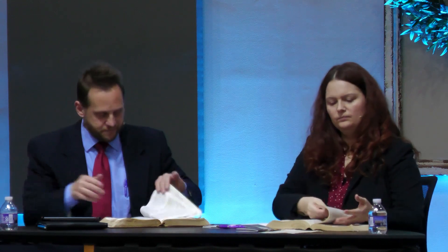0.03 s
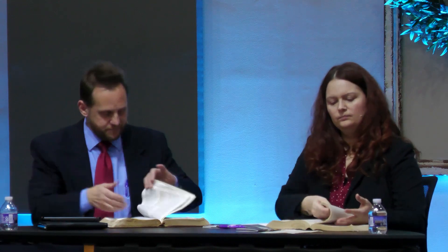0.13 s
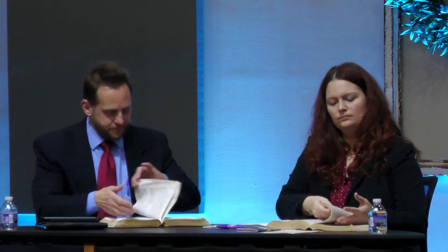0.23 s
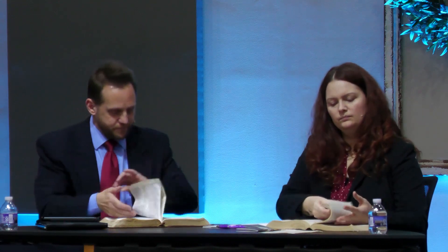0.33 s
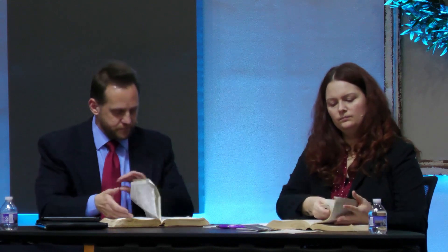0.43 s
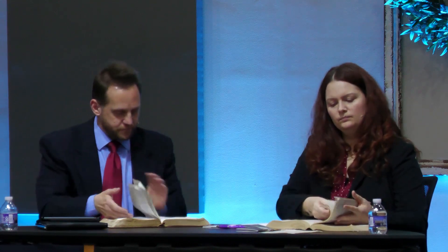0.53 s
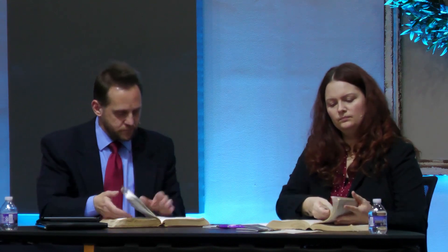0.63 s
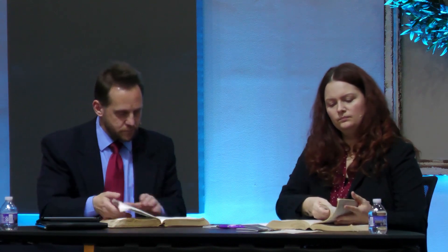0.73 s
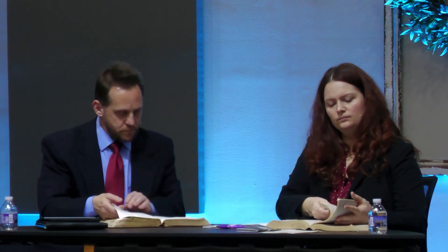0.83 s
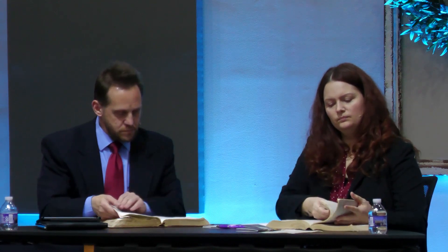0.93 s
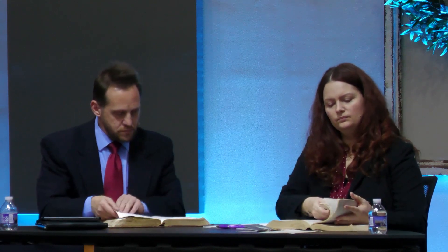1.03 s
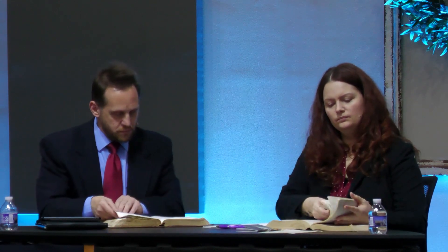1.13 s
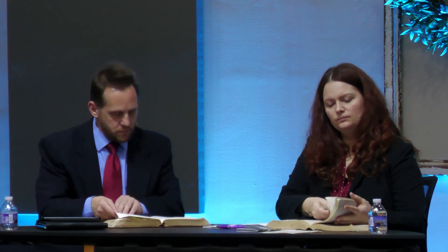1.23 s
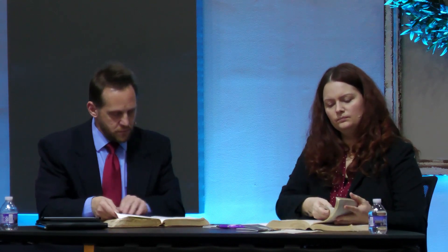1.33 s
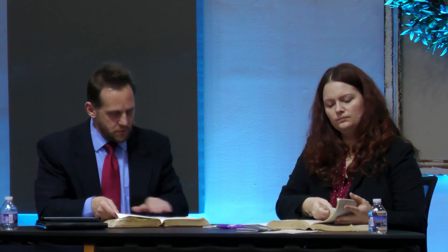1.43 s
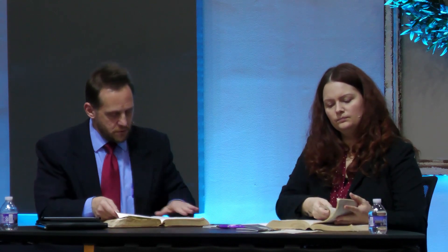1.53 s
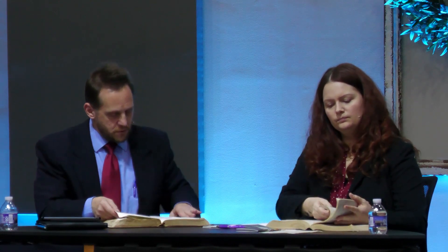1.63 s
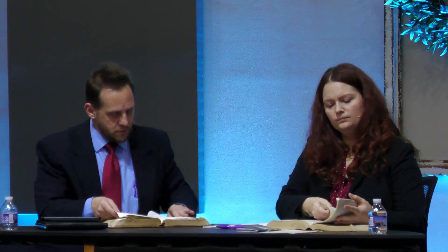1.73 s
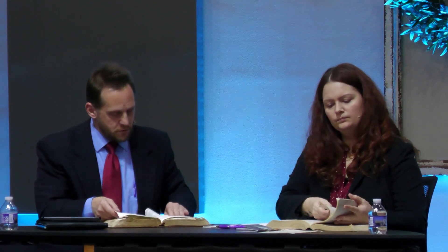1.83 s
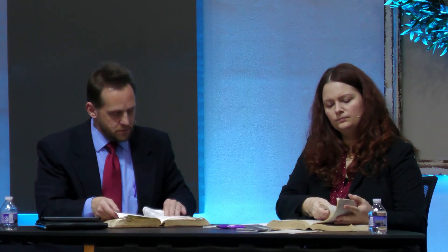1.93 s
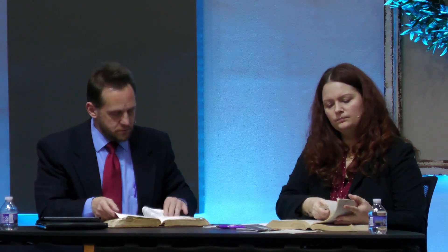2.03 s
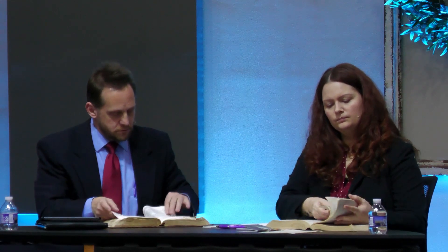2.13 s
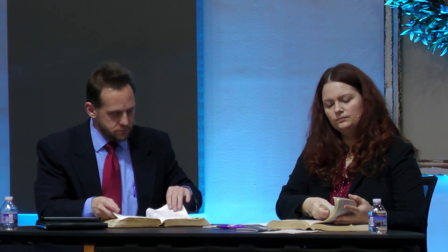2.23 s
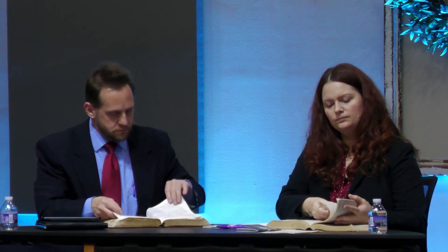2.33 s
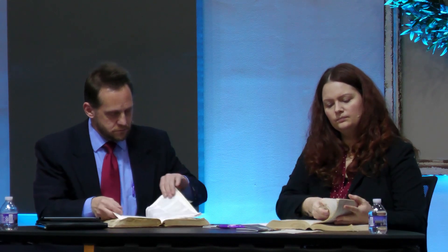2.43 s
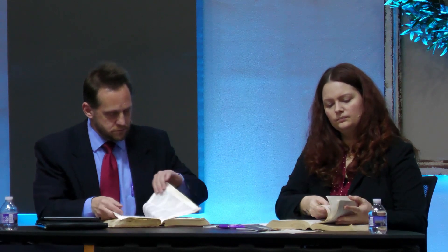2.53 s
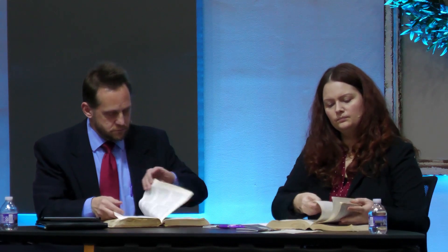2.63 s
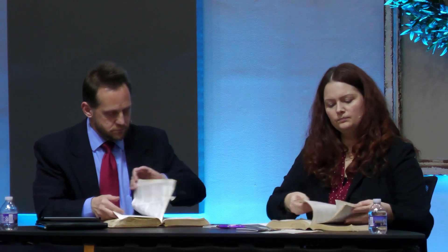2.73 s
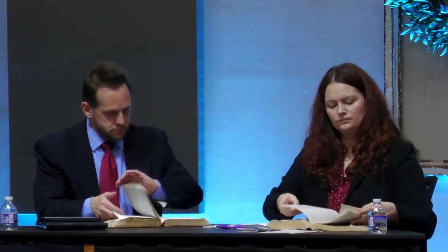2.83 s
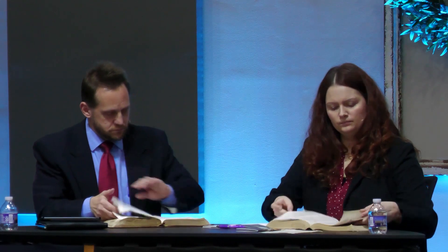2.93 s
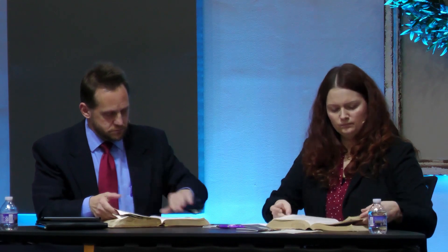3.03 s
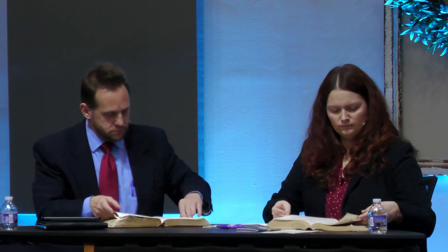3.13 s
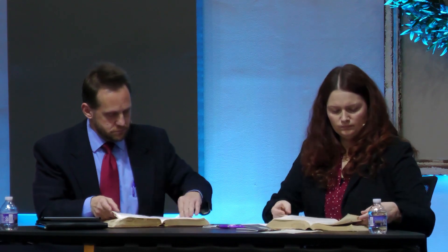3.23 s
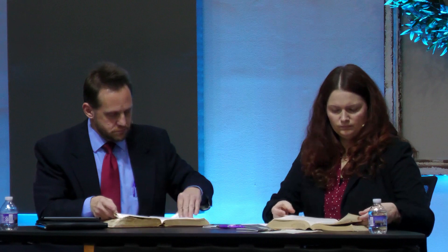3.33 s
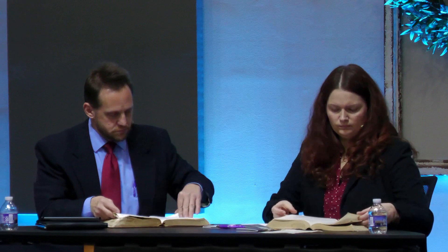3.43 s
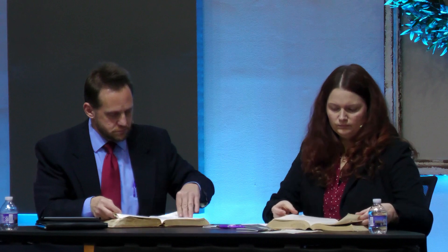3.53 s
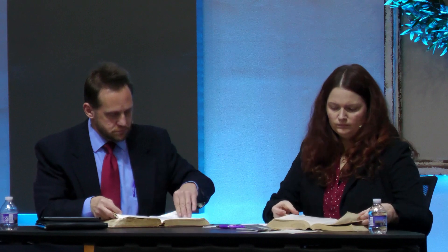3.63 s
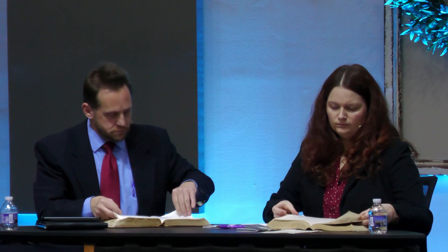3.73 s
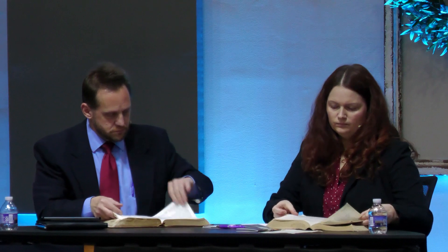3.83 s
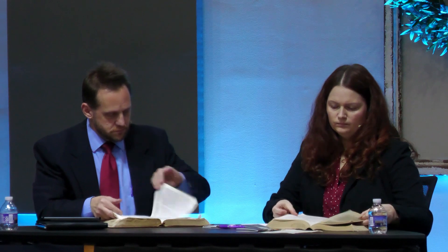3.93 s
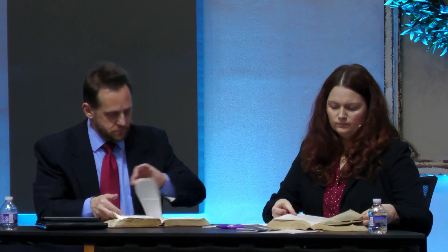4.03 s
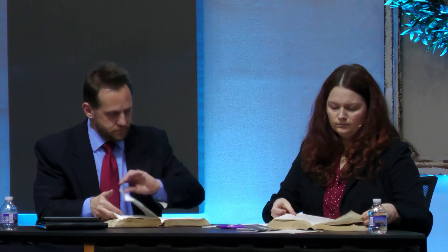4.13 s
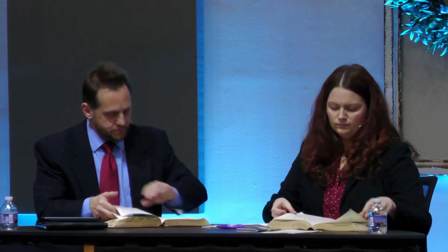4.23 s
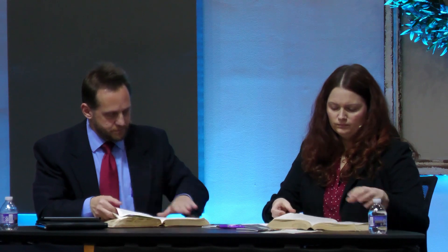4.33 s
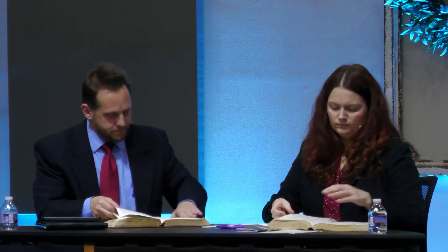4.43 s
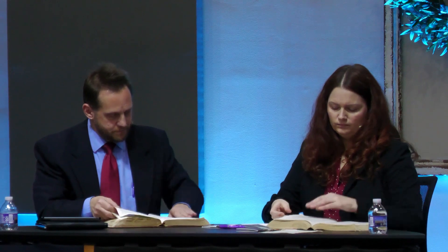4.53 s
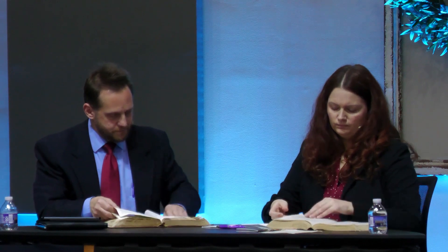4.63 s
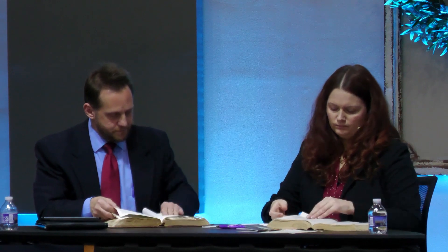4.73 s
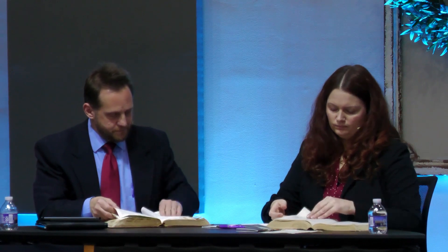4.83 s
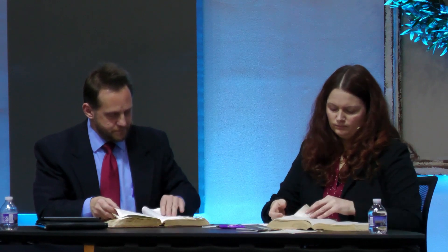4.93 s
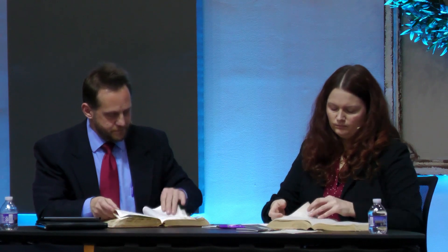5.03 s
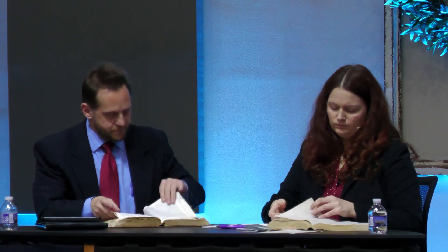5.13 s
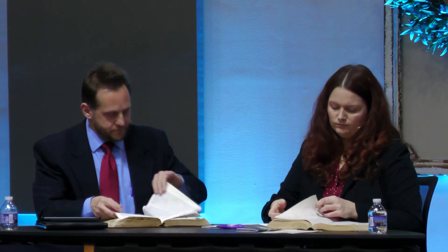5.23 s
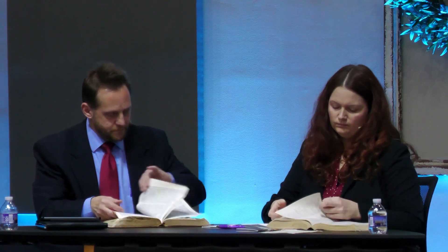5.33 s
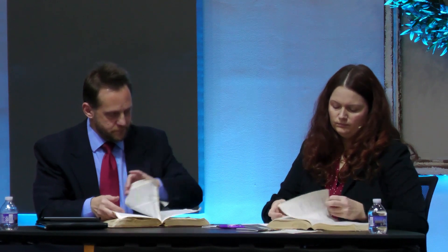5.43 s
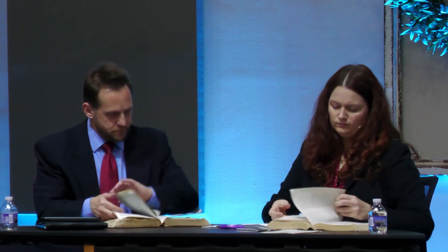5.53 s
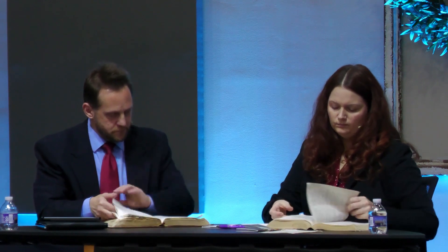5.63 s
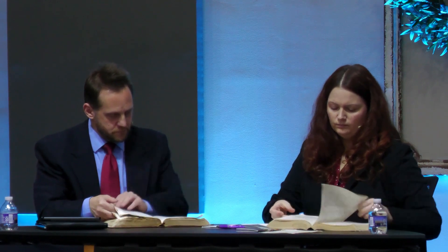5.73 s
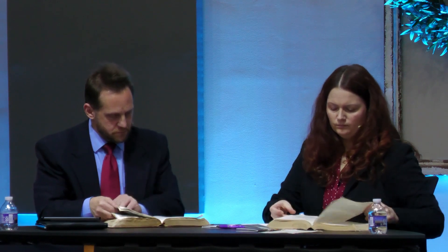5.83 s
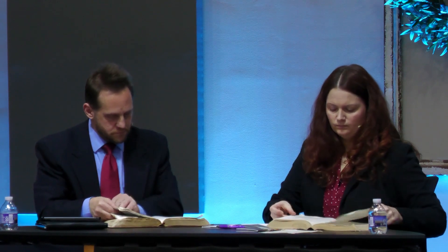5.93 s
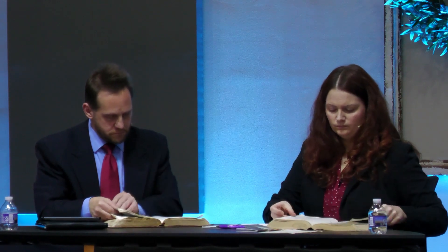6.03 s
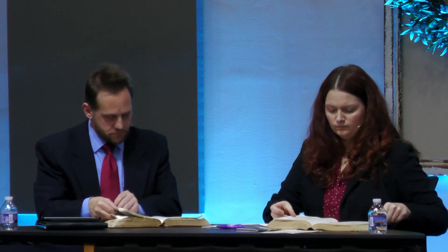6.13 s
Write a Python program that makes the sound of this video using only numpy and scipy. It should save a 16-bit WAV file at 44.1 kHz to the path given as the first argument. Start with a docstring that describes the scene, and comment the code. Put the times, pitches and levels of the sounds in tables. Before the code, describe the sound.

Close, soft rustling and sliding of thin paper as two readers turn book pages, with small snaps over faint ventilation.

```python
"""Two readers leaf through thin-paged books at a table in a quiet hall, close to a microphone.
First, sliding sheets hiss, bending pages rustle, creases buckle in short snaps and leaves flap down.
After a second the handling grows quiet; from about 2.5 s the snaps and rustles pick up again.
The last second is the busiest, with a sharp snap and then several flaps as leaves land on the stack.
Soft sleeves, ventilation and a faint hiss lie underneath throughout."""
import sys
import numpy as np
from scipy import signal
from scipy.fft import rfft, irfft, next_fast_len
from scipy.io import wavfile
from scipy.ndimage import uniform_filter1d, map_coordinates

SR = 44100
rng = np.random.default_rng(int(sys.argv[2]) if len(sys.argv) > 2 else 0)


def file_out(sig):
    """Save sig as 16-bit WAV at sys.argv[1]."""
    # one column per channel
    cols = np.atleast_2d(sig).T
    # limit, then scale
    lim = np.clip(cols, -1, 1)
    pcm = np.round(lim * 32767).astype(np.int16)
    wavfile.write(sys.argv[1], SR, pcm)


N = 272626


def rustle():
    """Sliding sheets hiss and bending sheets rustle; the uneven drag of the hand shakes both."""
    # tone of sliding and of bending paper: (frequency [Hz], level [dB])
    slide_tone = [(300, -27.5), (1200, -17), (2500, -15), (4500, -6), (7000, -1.5), (9000, -2), (11000, -2),
                  (13500, -5.5), (15500, -10)]
    bend_tone = [(100, -15.5), (250, -15.5), (450, -10), (800, -7.5), (1200, -5.5), (1800, -1),
                 (2600, -0.5), (3700, -0.5), (4700, 1), (7000, -5.5), (15000, -30.5)]
    # how the air under a lifted leaf changes the tone: (frequency [Hz], gain [dB])
    hollow_tone = [(1000, 5), (2800, 1.5), (3900, 4.5), (4600, -5.5), (5500, -7), (7000, -1.5), (9200, 2.5),
                   (12000, 0), (15000, -8)]
    now = np.arange(N) / SR
    bend_db, slide_db = handling(now)
    drag_db = 0.75 * wobble(55)
    hiss = friction(slide_tone, slips_per_s=6000, spread_db=4.5, smooth=1.04, patchy_db=2.5)
    # a faster slide is louder and also brighter, most of all when the sheet lies flat
    speed = np.clip((slide_db + 60) / 12 + 0.05 * (slide_db - bend_db - 8), 0, 1.3)
    bright_hiss = unit(coloured(hiss, lambda hz: along([(8000, 0.5), (15000, 6.1)], hz)))
    slide = amp(slide_db + drag_db + 1.72) * ((1 - speed) * hiss + speed * bright_hiss)
    bend_gain = amp(bend_db + drag_db + 1.7 * wobble(70) + 0.5)
    bend = bend_gain * friction(bend_tone, slips_per_s=1200, spread_db=3, smooth=1.42, patchy_db=3)
    # the more a sheet bends, the more it crinkles
    bending = np.clip((bend_db - slide_db + 18.5) / 17, 0.2, 1)
    sheets = (slide + bend) * crinkle(share=0.48 * bending)
    pocket = air_pocket(now)
    hollow = coloured(sheets, lambda hz: along(hollow_tone, hz))
    return (1 - pocket) * sheets + pocket * hollow


def handling(now, rise_s=0.012, rest_s=0.023, sag_db_per_s=4):
    """Bending and sliding levels in dB: the hand gets going, slows a little, and the sheet comes to rest."""
    # strokes of a hand moving a page: (start [s], length [s], bending level [dB], sliding level [dB])
    strokes = [(-0.01, 0.038, -54.5, -49.5), (0.04, 0.037, -53.5, -58), (0.151, .15, -58, -53.5),
               (0.4, 0.05, -54, -69), (0.688, 0.014, -52, -48.5), (0.716, 0.066, -50, -65),
               (0.808, 0.068, -58.5, -61), (1.247, 0.13, -62.5, -65.5), (1.68, 0.19, -67.5, -67),
               (1.862, 0.18, -71, -60), (2.154, 0.059, -74, -59.5), (2.28, .3, -63, -66.5),
               (2.677, 0.12, -57.5, -56), (2.913, 0.065, -55.5, -58), (3.049, 0.032, -61.5, -51.5),
               (3.282, 0.1, -70, -52.5), (3.44, 0.066, -65, -54), (3.6, 0.058, -70, -62),
               (3.702, 0.052, -68, -53.5), (3.843, 0.096, -54.5, -53.5), (4.009, 0.033, -53.5, -48),
               (4.106, 0.031, -55.5, -72), (4.151, 0.026, -66, -46), (4.363, .11, -69, -61),
               (4.559, 0.091, -68, -59), (4.68, 0.063, -62.5, -57.5), (4.818, 0.097, -73, -56),
               (4.944, 0.029, -66, -52), (5.043, 0.069, -55.5, -45), (5.131, 0.086, -53.5, -47),
               (5.293, 0.01, -58, -57), (5.392, 0.068, -55.5, -49), (5.543, 0.086, -54, -48.5),
               (5.678, 0.1, -65, -51.5), (5.804, 0.034, -51.5, -52), (5.891, 0.11, -62, -52),
               (6.005, 0.09, -75, -47)]
    # fingers resting on the paper between strokes: (time [s], hiss level [dB])
    resting_fingers = [(0, -55.5), (0.62, -70), (2.12, -76.5), (2.65, -58), (3.2, -66.5), (3.95, -62.5),
                       (4.3, -67.5), (5.0, -64), (5.7, -58), (6.18, -64)]
    touch = amp(np.interp(now, *np.transpose(resting_fingers)))
    bend_power, slide_power = (amp(-2.5) * touch) ** 2, touch ** 2
    for start, length, bend_db, slide_db in strokes:
        t = now - start
        rise = np.clip(t / rise_s, 0, 1)
        hold = amp(-sag_db_per_s * np.clip(t, 0, length))
        stroke = rise * hold * np.exp(-np.maximum(t - length, 0) / rest_s)
        bend_power += (amp(bend_db) * stroke) ** 2
        slide_power += (amp(slide_db) * stroke) ** 2
    return 10 * np.log10(bend_power), 10 * np.log10(slide_power)


def friction(tone, slips_per_s, spread_db, smooth, patchy_db):
    """Paper fibres make tiny slips over a smooth hiss; the tone shifts as the sheet changes shape."""
    slips = (rng.random(N) < slips_per_s / SR) * rng.choice([-1, 1], N)
    slips = slips * amp(spread_db * np.clip(rng.standard_normal(N), -2, 2))
    spectrum = signal.stft(unit(slips) + smooth * rng.standard_normal(N), nperseg=256)[2]
    # random louder and softer patches, smoothed over frequency and then over time
    patches = uniform_filter1d(rng.standard_normal(spectrum.shape), size=5, axis=0)
    patches = uniform_filter1d(patches, size=18, axis=1)
    shifting = signal.istft(spectrum * amp(patchy_db * unit(patches)), nperseg=256)[1][:N]
    return unit(coloured(shifting, lambda hz: along(tone, hz)))


def crinkle(share, creases_per_s=110, spread_db=3, fade_s=0.0013):
    """Gain of a crumpling sheet: tiny creases give way at random, each a brief surge of the rustle."""
    gives_way = rng.random(N) < creases_per_s / SR
    power = amp(spread_db * np.minimum(rng.standard_exponential(N), 3)) ** 2
    surges = signal.lfilter([1], [1, -np.exp(-1 / (fade_s * SR))], gives_way * power)
    return np.sqrt(1 - share + share * surges / surges.mean())


def air_pocket(now, lift_s=0.099, sink_s=0.082):
    """The share of the rustle, from 0 to 1, that passes through the air under a lifted leaf."""
    # times when a leaf is held up: (start [s], length [s])
    pockets = [(4.14, 0.099), (5.795, 0.26)]
    shares = [np.exp(np.minimum(now - start, 0) / lift_s - np.maximum(now - start - length, 0) / sink_s)
              for start, length in pockets]
    return np.max(shares, axis=0)


def snaps():
    """A crease strains, buckles in a burst of tiny cracks, and the sheet shivers briefly after it."""
    # creases buckling: (time [s], level [dB], length [s], low body [dB], crisp top [dB])
    buckles = [(0.043, -30.5, .0022, -21, -1.5), (0.0775, -34.5, 0.0034, -17, 1),
               (0.2074, -35, .0025, -11, 10), (0.2562, -34, 0.002, -20, 6), (0.3744, -40.5, 0.0019, -6, 2),
               (0.422, -44.5, .0028, 0, -2), (0.452, -39, 0.0015, 4, -22), (0.471, -48, 0.0038, 4, 23),
               (0.5846, -51.5, .002, -15, -7), (1.031, -48.5, 0.004, -6, -3.5),
               (1.0793, -39.5, 0.0017, -9, 5.5), (1.153, -45, 0.0022, -12, -3),
               (1.1637, -47.5, 0.0034, -9, 0), (1.563, -56, .0028, 10, -3), (1.8305, -40, 0.0019, 9, 0.5),
               (2.129, -46, .0009, -17, 10), (2.26, -39, 0.00085, -3, 5), (2.5053, -40, 0.0037, -3, -1.5),
               (2.5546, -31.5, 0.0031, -31, -8.5), (2.7025, -30, 0.00062, -16, 2),
               (2.7887, -30.5, 0.00067, -5, 5.5), (2.842, -44.5, 0.0023, -21, -10),
               (2.944, -39.5, 0.0052, -32, 5), (2.986, -44, .0011, -20, 4), (3.0218, -44, 0.0032, -6, -9),
               (3.423, -35.5, .0004, -11, 20), (3.5776, -42.5, 0.0031, -20, -6),
               (3.591, -30.5, 0.0011, -17, 1.5), (3.624, -33.5, 0.0022, -0.5, 11),
               (3.6579, -31.5, 0.00067, -22, 3), (3.7666, -39, 0.0017, -7, -10),
               (3.7833, -34, 0.0012, -12, 7), (3.8185, -35.5, 0.0044, -7, 2), (3.9031, -25, 0.0015, -8, 7),
               (3.9313, -26.5, 0.0016, -12, 1.5), (4.731, -42, 0.0026, 0.5, 6),
               (4.8765, -42.5, 0.0019, -22, 7), (4.959, -33, 0.00073, -18, -2),
               (4.9928, -22, 0.00034, -20, 4), (5.034, -36, 0.0022, -16, 3), (5.2744, -36, 0.0021, -4, 6),
               (5.3556, -39.5, .0007, -8, 7), (5.404, -37.5, 0.0025, -4.5, 1),
               (5.5255, -14.5, 0.00052, -18.5, 3), (5.53, -30, 0.0022, -19, -5),
               (5.8051, -26.5, 0.0043, -3.5, 11.5), (6.1155, -39, 0.0022, -5, 6)]
    # tone shared by all creases: (frequency [Hz], level [dB])
    crease_tone = [(150, -17), (500, -5.5), (1000, -10), (2000, -7.5), (3500, -2), (6000, 1), (7700, -2),
                   (9400, 1), (11000, -2), (13500, -5.5), (16000, -15.5)]
    track, t = np.zeros(N), np.arange(-SR // 30, SR // 20) / SR
    after, before = np.maximum(t, 0), np.minimum(t, 0)
    for time, db, length, low_db, top_db in buckles:
        burst = np.exp(before / (0.065 * length) - (after / (1.37 * length)) ** 2)
        shiver = amp(-9.5) * np.sqrt(length / 0.0015) * np.exp(before / 0.00077 - after / 0.0025)
        cracks = rng.standard_normal(len(t)) * amp(2.2 * rng.standard_normal(len(t)))
        cracks *= np.hypot(np.hypot(burst, shiver), nearby_creases(t))
        own_tone = [(450, -9), (950, low_db + 8.5), (2000, 0.55 * low_db + 5),
                    (4200, 0.5), (9500, top_db), (15500, 0.81 * top_db)]
        tone = lambda hz: along(crease_tone, hz) + along(own_tone, hz) + sheet_ripple(hz, depth_db=0.5)
        snap = coloured(cracks, tone)
        add(track, time + t[0], amp(db) * np.sqrt(length * SR) * snap / np.linalg.norm(snap))
    return track


def nearby_creases(t, count=5, spread_s=0.012, fade_s=0.00052):
    """Strength over time of the small creases that give way just before and after a large one."""
    age = t - spread_s * rng.uniform(-0.3, 2, (count, 1))
    sizes = amp(-18 + 2.3 * rng.uniform(-1.1, 1, (count, 1)))
    return np.sum(sizes * (age > 0) * np.exp(-np.abs(age) / fade_s), axis=0)


def flaps():
    """A leaf swells in sound as it swings, then slaps and settles with a hollow papery puff."""
    # leaves landing: (time [s], level [dB], rise [s], fall [s], brightness [dB per octave])
    landings = [(0.020, -40, 0.0068, 0.0044, 13), (0.523, -47.5, 0.0018, 0.013, -1.5),
                (0.776, -38.5, 0.011, 0.0052, 6), (1.372, -54, 0.0084, 0.0046, 6),
                (2.95, -45, 0.0031, 0.0055, 11), (4.604, -54, 0.0082, .010, -17),
                (5.548, -42, 0.0034, 0.016, -3), (5.619, -46, 0.0036, 0.0094, -9.5),
                (5.745, -47.5, .012, 0.011, -8.5), (5.808, -29, 0.0073, 0.0058, -4.5),
                (5.817, -29, 0.0023, 0.0043, -6), (5.921, -39, 0.0095, 0.013, -3),
                (5.952, -36, 0.0041, 0.0087, -5)]
    # tone of a landing leaf: (frequency [Hz], level [dB])
    leaf_tone = [(100, -28), (350, -40), (800, -17.5), (1450, -6), (2200, -3), (3000, 1.5), (3950, 6),
                 (4600, -3.5), (7500, -7), (9200, -7.5), (12000, -22), (15500, -29)]
    track, t = np.zeros(N), np.arange(-SR // 10, SR // 10) / SR
    for time, db, rise, fall, brightness in landings:
        tone = lambda hz: (along(leaf_tone, hz) + brightness * np.log2(hz / 3000 + 0.22)
                           + sheet_ripple(hz, depth_db=4))
        swell = np.exp(-np.abs(t) / np.where(t < 0, rise, fall))
        add(track, time + t[0], amp(db) * swell * noise(len(t), tone))
    return track


def sheet_ripple(hz, depth_db, count=22):
    """Each bent shape of a sheet favours its own frequencies: a random gain curve in dB."""
    return depth_db * np.interp(np.sqrt(hz / hz[-1]), np.linspace(0, 1, count), rng.standard_normal(count))


def rubs():
    """Rubbing makes a taut sheet whisper around one pitch, swelling and fading with the stroke."""
    # fingertips and sheet edges dragging: (time [s], relative level [dB], half length [s], pitch [Hz])
    drags = [(0.015, -48, .020, 4000), (0.743, -61, 0.025, 6880), (1.728, -67, 0.058, 5600),
             (2.355, -65, 0.033, 5430), (3.092, -58, 0.024, 8850), (3.485, -63.5, 0.032, 3900),
             (3.873, -51.5, 0.015, 4000), (4.180, -57, 0.02, 10000), (4.428, -54, 0.0043, 4950),
             (4.959, -49.5, 0.011, 5300), (5.108, -55, 0.034, 4600), (5.428, -55, 0.025, 4640)]
    track, t = np.zeros(N), np.arange(-SR // 5, SR // 5) / SR
    for time, db, half_length, pitch in drags:
        resonance = lambda hz: -20 * np.log10(1 + ((hz - pitch) / (0.13 * pitch)) ** 2)
        swell = np.exp(-0.5 * (t / half_length) ** 2)
        add(track, time + t[0], amp(db - 1.3) * swell * noise(len(t), resonance))
    return track


def puffs(rise_s=0.0051, fall_s=0.022):
    """A falling leaf squeezes out the air beneath it with a soft, low thump."""
    # thumps of air: (time [s], level [dB])
    thumps = [(0.025, -58.5), (0.426, -55.5), (3.93, -59), (4.04, -64), (5.807, -59)]
    # tone of the escaping air: (frequency [Hz], level [dB])
    air_tone = [(50, -4), (130, -1), (300, -1), (600, -13), (1200, -16), (4000, -50)]
    track, t = np.zeros(N), np.arange(-SR // 20, SR // 5) / SR
    swell = np.exp(-np.abs(t) / np.where(t < 0, rise_s, fall_s))
    for time, db in thumps:
        add(track, time + t[0], amp(db) * swell * noise(len(t), lambda hz: along(air_tone, hz)))
    return track


def sleeves():
    """Cloth moves with the arms as a dull, soft brush."""
    # sleeves brushing the table: (time [s], level [dB])
    brushing = [(0, -66.5), (0.5, -72), (1.0, -83), (2.3, -81), (2.8, -68.5), (3.3, -68.5), (3.95, -69),
                (4.4, -70.5), (5.0, -77), (5.6, -64), (6.18, -77)]
    # tone of the cloth: (frequency [Hz], level [dB])
    cloth_tone = [(60, -11), (170, 1), (280, -0.5), (380, -10.5), (520, -3), (900, -12.5), (2000, -28.5)]
    level_db = np.interp(np.arange(N) / SR, *np.transpose(brushing))
    return amp(level_db) * noise(N, lambda hz: along(cloth_tone, hz))


def hall_echo(sound, build_s=0.011):
    """The hall answers with an echo whose treble dies first."""
    # how long the hall rings: (frequency [Hz], time to fade by 60 dB [s])
    fade_times = [(200, 0.41), (2000, 0.65), (12000, 0.22)]
    hz, t, spectrum = signal.stft(rng.standard_normal(SR // 2), SR, nperseg=256)
    fade = amp(-60 * t / along(fade_times, hz)[:, None])
    tail = signal.istft(spectrum * fade, SR, nperseg=256)[1]
    tail *= np.minimum(np.arange(len(tail)) / SR / build_s, 1)
    return signal.fftconvolve(sound, tail / np.linalg.norm(tail))[:N]


def ventilation():
    """Ventilation rumbles under an even hiss."""
    # tone of the quiet hall: (frequency [Hz], level [dB])
    hall_tone = [(6, 17.5), (22, 1.5), (45, -3.5), (72, 3), (95, -3), (120, -0.5), (150, -4), (200, -2.5),
                 (330, -13), (600, -14.5), (1200, -17), (5000, -21), (10000, -19.5), (15500, -22.5)]
    return amp(-59.5) * noise(N, lambda hz: along(hall_tone, hz))


def amp(db):
    """Turn decibels into a gain to multiply by."""
    return 10 ** (np.asarray(db) / 20)


def unit(x):
    """Scale a sound to an average (rms) strength of 1."""
    return x / np.sqrt(np.mean(x ** 2) + 1e-20)


def along(points, hz):
    """Read between (frequency [Hz], value) points, with the octaves evenly spaced."""
    frequencies, values = np.transpose(points)
    return np.interp(np.log(hz + 1), np.log(frequencies + 1), values)


def wobble(rate):
    """A smooth curve through `rate` random values a second."""
    return map_coordinates(rng.standard_normal(int(N * rate / SR) + 4), [np.arange(N) * rate / SR])


def coloured(x, gain_db):
    """Change the tone of x; gain_db(hz) says how much to raise or lower each frequency."""
    size = 2 * next_fast_len(len(x) // 2 + 1024)
    cepstrum = irfft(np.log(amp(gain_db(np.fft.rfftfreq(size, 1 / SR))) + 1e-6))
    # keeping only the first half makes the filter ring after a sound, never before it
    cepstrum[1:size // 2] *= 2
    cepstrum[size // 2 + 1:] = 0
    return irfft(rfft(x, size) * np.exp(rfft(cepstrum)), size)[:len(x)]


def noise(samples, gain_db):
    """Random noise of strength 1 with the given tone."""
    return unit(coloured(rng.standard_normal(samples), gain_db))


def add(track, start_s, sound):
    """Mix a sound into the track from the given time."""
    start = round(start_s * SR)
    sound = sound[max(-start, 0):N - start]
    track[max(start, 0):][:len(sound)] += sound


def scene():
    """The books lie close to the microphone, so the hall adds little."""
    paper = rustle() + rubs() + snaps() + flaps() + puffs()
    return (paper + amp(-14.5) * hall_echo(paper) + sleeves() + ventilation())[None]


def record(dry):
    """The very highest treble is cut away."""
    top_hz = 15600
    size = next_fast_len(N + SR // 2)
    return irfft(rfft(dry, size) * (np.fft.rfftfreq(size, 1 / SR) < top_hz), size)[:, :N]


dry = scene()
out = record(dry)
file_out(out)
```